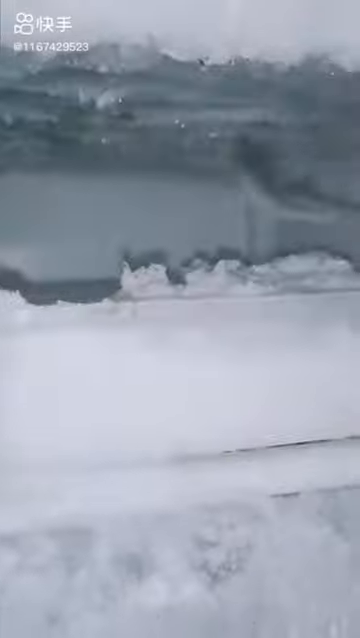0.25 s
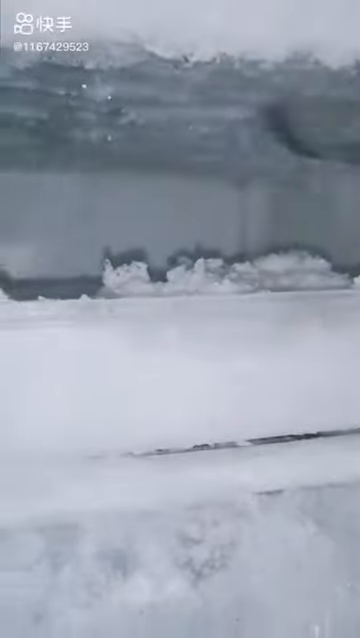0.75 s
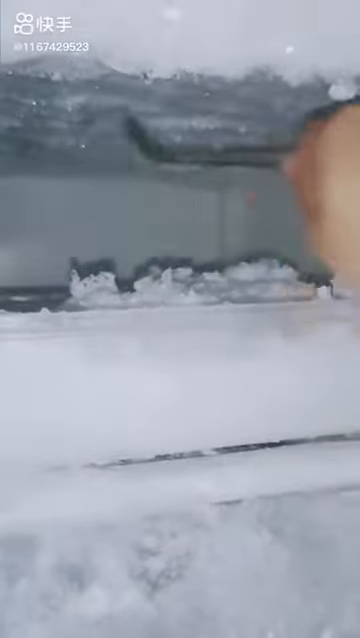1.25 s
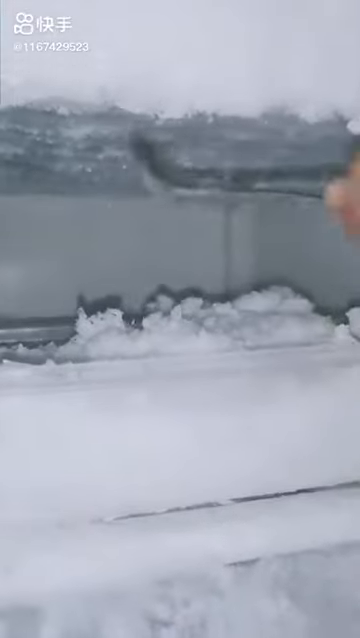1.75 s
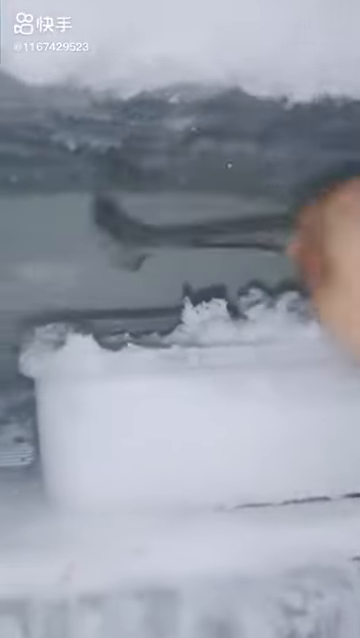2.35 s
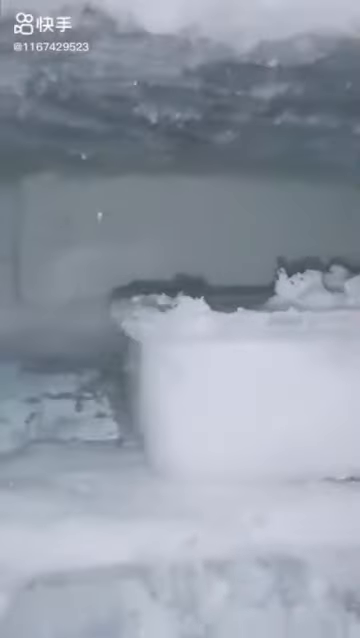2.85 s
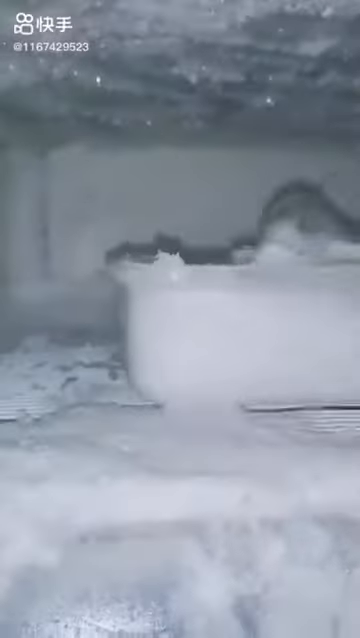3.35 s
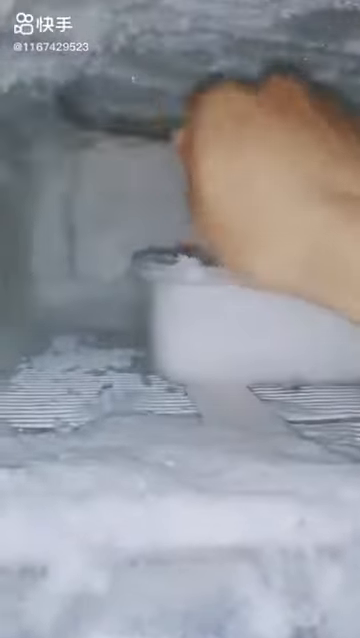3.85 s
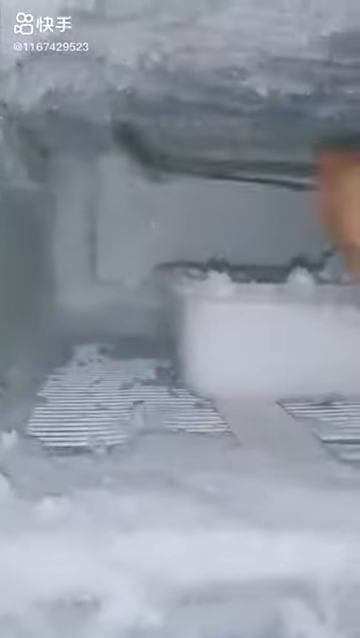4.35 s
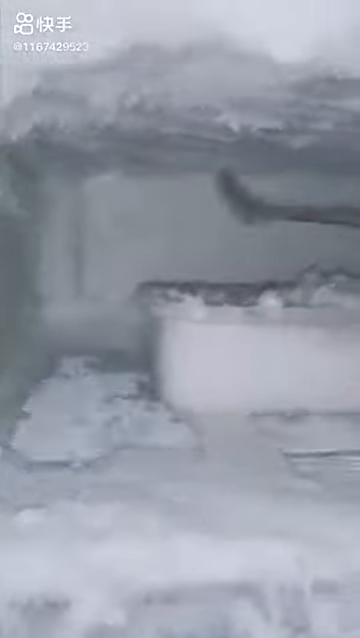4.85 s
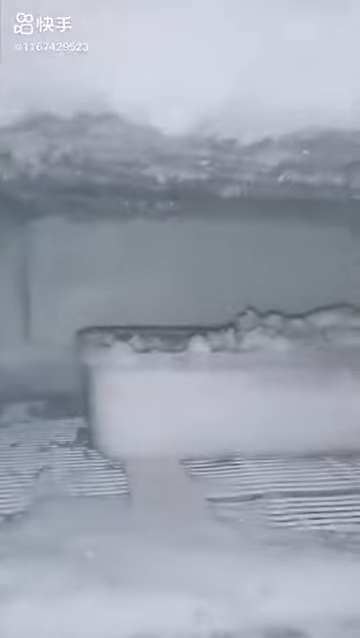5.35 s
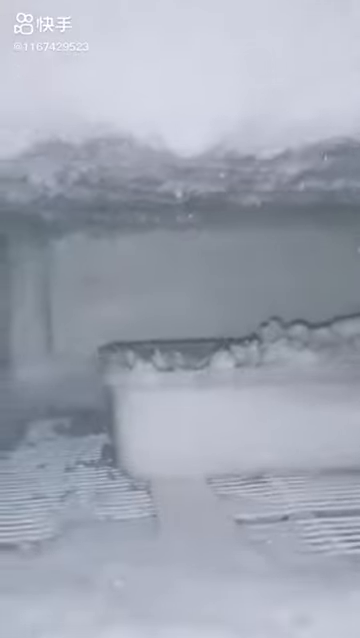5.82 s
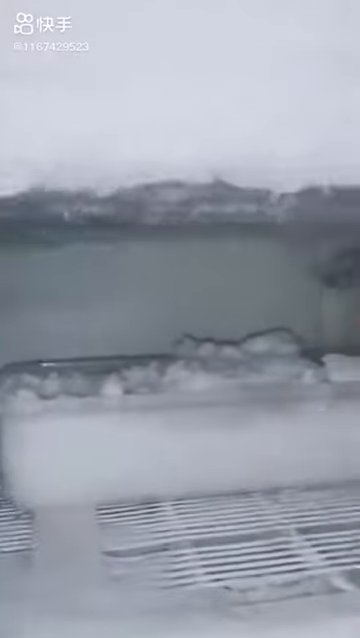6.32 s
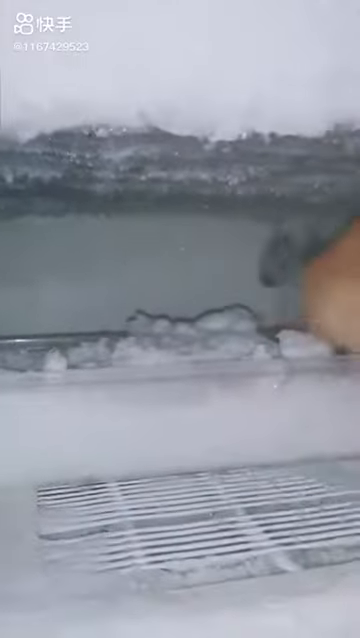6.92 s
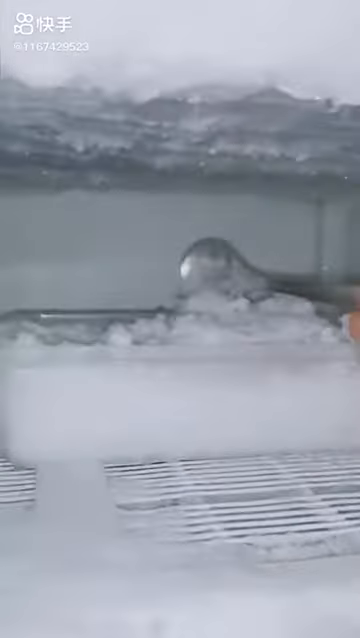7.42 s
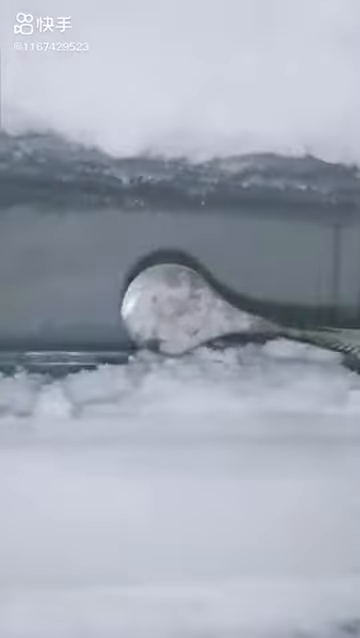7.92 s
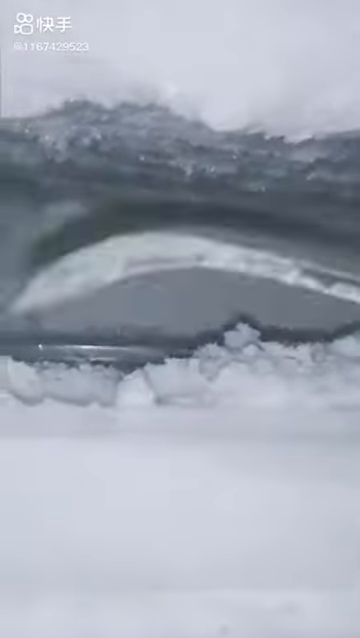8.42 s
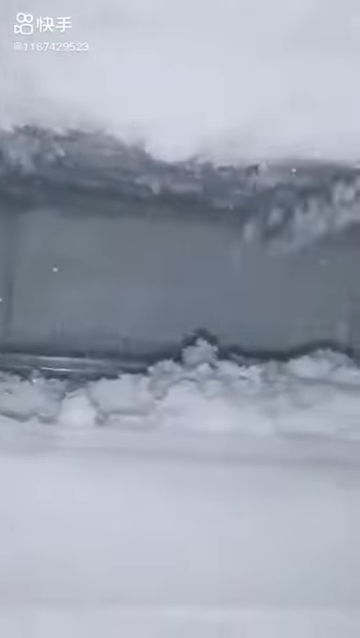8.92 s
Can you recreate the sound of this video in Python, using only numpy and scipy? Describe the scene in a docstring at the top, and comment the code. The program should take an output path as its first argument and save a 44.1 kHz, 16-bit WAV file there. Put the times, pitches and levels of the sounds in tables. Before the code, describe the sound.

Close, dry scraping of ice inside a small freezer compartment, uneven crunchy rasps, brittle ticks, dull bumps and soft sweeps of frost crystals.

```python
"""A metal scraper rasps frost off the roof of a freezer compartment, close to the microphone.
Strokes excite fizz, blade modes and the hollow liner with stick-slip bursts of tiny ice fractures.
Sweeps of loose frost hiss from trains of grains; knocks, snaps and clacks are brief impulsive breaks.
Bumps are damped hollow notes and squeaks are narrow noise bands, each flake colours the rasp, and dense
reflections answer from the small compartment. Shaped noise, a wavering hum and a rumble lie underneath."""
import sys
import numpy as np
from scipy import signal
from scipy.fft import rfft, irfft
from scipy.io import wavfile
from scipy.ndimage import uniform_filter1d

SR = 44100
rng = np.random.default_rng(int(sys.argv[2]) if len(sys.argv) > 2 else 0)


def store_wav(level_fs):
    """Save 16-bit WAV to argv[1]."""
    pcm = np.round(np.clip(np.atleast_2d(level_fs), -1, 1) * 32767)
    wavfile.write(sys.argv[1], SR, pcm.T.astype(np.int16))


N = 404816  # samples

# Background noise floor. Each row: frequency in Hz, relative level in dB.
FLOOR_COLOUR = [(15, -41.5), (25, -16), (59, -12.5), (120, -18), (156, -13), (187, -23.5), (237, -8.5),
                (593, -25), (4810, -42.5), (5780, -27.5), (13000, -60)]
FLOOR_DB = -43.5  # rms
# Steady hum. Each row: frequency in Hz, level in dB before it wavers.
HUM = [(57, -45.5), (101, -53.5), (165, -53.5)]
# The arm rubs and jostles the cabinet: one list per spell. Each row: time in seconds, level in dB.
JOSTLE = [
    [(2.4, -40.5), (3.016, -39.5), (3.06, -50), (3.36, -41), (3.396, -32.5), (3.708, -41), (3.82, -55)],
    [(7.1, -47), (7.58, -44), (7.678, -53), (7.866, -39), (8.1, -59)],
]
# Colour of that rumble. Each row: frequency in Hz, relative level in dB.
RUMBLE_COLOUR = [(15, -10), (45, -4), (110, 4.5), (220, -6.5), (400, -6.5), (1500, -62)]
# Likeness of left and right in the background. Each row: frequency in Hz, correlation (1 is mono).
LIKENESS = [(50, 0.39), (300, 0.82), (1000, 0.024), (5000, 0.014)]

# Pushes of the blade. Each row: start, leaning in, hold and lifting off in seconds, then drive in dB of
# the fizz of loose frost, the crunch of hard ice and the push on the liner, before trims.
STROKES = [ (0.065, 0.11, 0.082, 0.174, -22.5, -24.5, -27.5),
           (0.27, 0.051, 0.024, 0.097, -27.5, -23, -22.5), (0.48, 0.11, 0.012, 0.079, -34, -36.5, -37.5),
           (0.774, 0.031, 0.24, 0.017, -26, -22, -26.5), (1.062, 0.0039, 0.038, 0.039, -42.5, -43, -41),
           (1.399, 0.083, 0.078, 0.083, -23, -22.5, -25.5), (1.614, 0.0034, 0.082, 0.063, -37.5, -38, -43),
           (2.002, 0.12, 0.078, 0.065, -25, -23.5, -24), (2.701, 0.062, 0.055, 0.045, -30.5, -28.5, -26.5),
           (2.786, 0.021, 0.14, 0.12, -28, -25, -22.5), (2.98, 0.065, 0.014, 0.11, -30, -28, -30.5),
           (3.997, 0.0023, 0.042, 0.11, -28.5, -24.5, -35.5), (4.082, 0.006, 0.165, 0.18, -26, -27, -26),
           (4.308, 0.034, 0.019, 0.063, -32, -31, -26.5), (4.625, 0.084, .11, 0.11, -21, -24.5, -23.5),
           (4.883, 0.0038, 0.061, 0.031, -33.5, -38.5, -36.5), (5.219, 0.07, 0.076, 0.1334, -25, -23, -23),
           (6.142, 0.0058, 0.09, 0.029, -31, -33, -36), (6.381, 0.013, 0.033, 0.048, -27.5, -23.5, -24),
           (6.475, 0.0075, 0.022, 0.077, -28, -25.5, -30.5), (6.752, 0.03, 0.06, 0.059, -23, -22.5, -25),
           (6.872, 0.019, 0.041, 0.054, -25.5, -22.5, -24.5),
           (8.025, .001, 0.013, 0.025, -24.5, -29, -26.5), (8.053, 0.0049, 0.015, 0.036, -25.5, -29, -37),
           (8.416, 0.066, 0.021, 0.052, -39.5, -40.5, -45.5), (8.893, 0.049, 0.01, 0.023, -30.5, -32, -48),
           (9.05, 0.037, 0.016, 0.046, -28.5, -27, -45), ]
# The ice varies from place to place. Each row: time in seconds, then tilts in dB per octave of the fizz,
# the crunch and the liner.
ICE = [(0.3, 3, 2, 1.5), (1.5, -14.5, 10.5, 8), (2.15, -2, 3.5, 5), (2.9, 1.5, 3.5, 4.5), (3.6, -6, 1, 0),
       (4.2, -3, -1.5, 4.5), (5.0, 2, -2.5, -2), (6.001, -0.5, -5.5, 11), (6.45, -1, -14.5, 4.5),
       (6.9, -1.5, -9, 4.5), (7.8, -3, 0.5, 2.5), (9.0, 3, -2.5, 10.5)]
# Colours of one fracture. Each row: frequency in Hz, relative level in dB.
FIZZ = [(2500, -28), (4100, -21.5), (5200, 3), (6200, 0), (7100, 12), (7800, -1.5), (8600, -6.5),
        (9500, -14), (9950, -18), (11200, -9), (13000, -11)]
CRUNCH = [(100, -60), (400, -24.5), (850, -6.5), (1350, 3.5), (1950, 0.5), (2600, 3.5), (3300, 2.5),
          (3950, -2), (4600, 2.5), (5400, 0), (8000, -20.5)]
THUD = [(50, -41.5), (130, -2.5), (350, 4.5), (460, 4), (700, 10), (900, -3), (1500, -36), (4000, -69)]
# Modes of the liner and of the blade. Each row: frequency in Hz, relative level in dB, left over right in dB.
LINER_MODES = [(154.5, -5.5, 2.5), (236.8, -6.5, -3), (303.4, -4, -0.5), (450.4, 3.5, 2), (477, 0, 0.5),
               (563, -1, 11.5), (581.3, -6, 13), (664, -9.5, 12), (958, -13, -10), (1085, -15.5, 14)]
BLADE_MODES = [(5050, -14, 32), (5440, -4, -16), (7090, 3, -15)]
# How strongly the pressure's growth in dB acts, as factors for the fizz, the crunch and the liner.
FOLLOW = (0.63, 0.79, 0.68)
BITE_DB = 14  # how far below full pressure the edge first bites, before the FOLLOW factor
LIFT_DB = 35  # fall in pressure over one lift-off time
LINER_HANG_S = 0.0098  # the liner keeps shaking after the blade starts to lift
GRIP_S = 0.0017  # how fast the edge takes hold
# Lowest and highest note of the loose chips, in Hz.
CHIP_HZ = (1320, 5900)
CHIP_DB = -13.5  # against the crunch, before the trim of the stroke

# The blade lands or catches on a lump. Each row: time in seconds, fizz level in dB, crunch and liner in dB
# against the fizz, decay time of the break-up in seconds.
KNOCKS = [(0.067, -4.5, -16, -3, 0.00086), (0.396, -20.5, 4.5, 6, 0.003), (0.78, -21, 2.5, 3.5, 0.008),
          (0.875, -19.5, 15, -2, 0.0023), (1.04, -20, -15, 7.5, 0.0051), (1.398, -11, -9, -1.5, 0.0041),
          (1.914, -23.5, -8.5, -8, 0.0079), (2.004, -15, -14, -4, 0.0031), (2.584, -30, -11, -0.5, 0.018),
          (2.707, -21, 2.5, 14, 0.0071), (3.042, -18.5, 1, -6.5, 0.0099), (3.518, -16, -8, 2, 0.0088),
          (3.634, -24, -2, 12, 0.0045), (4.004, -11.5, 6, 12, 0.0017), (4.084, -25.5, 5.5, 16, 0.0093),
          (4.207, -17, -3.5, 4, 0.0078), (4.628, -24.5, 0, 9.5, 0.0091), (5.157, -40, 6.5, 16, 0.012),
          (5.396, -10.5, -19, 2.5, 0.0053), (5.961, -17.5, 6.5, 6, 0.002), (6.061, -31.5, -7.5, -10, 0.032),
          (6.163, -29, 13.5, 11, 0.0055), (6.27, -17, -7.5, -5.5, 0.0067), (6.388, -10, -15, -10, 0.0052),
          (6.9, -14, -1.5, 4, 0.0049), (7.495, -20, -20, -20, .006), (7.638, -18, -23, -25, 0.0053),
          (8.095, -22, -5, 11.5, 0.0019), (8.492, -27, -2, 8.5, 0.0039), (8.976, -19.5, -1.5, -6.5, 0.0043)]
# The blade squeaks on smooth ice. Each row: start and length in seconds, pitch in Hz, width in Hz,
# level in dB before the swell.
SQUEAKS = [(0.11, 0.093, 3360, 190, -28.5), (1.511, 0.095, 3880, 750, -24), (3.836, 0.17, 1430, 100, -47.5),
           (2.87, 0.055, 6900, 250, -24), (7.48, .1, 7000, 270, -26), (6.167, 0.024, 1100, 750, -20.5)]
# Single brittle snaps. Each row: time in seconds, strength in dB, crunch against fizz in dB.
SNAPS = [(0.173, 0, -20), (0.7802, 3.5, -25), (1.381, -12, -10), (1.635, -9, -4), (2.783, 2, -8),
         (3.755, 0.5, -16), (4.0041, 2, 1), (5.197, -13, 0), (5.961, -4, 11), (6.272, 0, -1.5),
         (6.786, -12, 0), (8.011, -4, 0), (8.0283, -0.5, 0), (8.038, -8, -7), (8.0962, 3, -9.5),
         (8.314, -15.5, -5), (8.87, -15.5, 2)]
SNAP_S = 0.00071  # decay time of a snap
# Sweeps of loose frost along the tray. Each row: start, leaning in, hold and lifting off in seconds,
# then levels in dB of the hiss, the crunch and the push on the tray at full pressure.
SWEEPS = [(3.394, 0.097, .27, 0.081, -24.5, -35.5, -32), (7.461, 0.07, 0.039, 0.13, -26.5, -38, -39.5),
          (7.601, 0.089, 0.094, 0.099, -22, -33.5, -34.5), (7.763, 0.038, 0.022, .05, -22.5, -36, -32),
          (7.825, 0.031, 0.078, 0.26, -29.5, -31.5, -32.5), (7.932, 0.053, 0.037, .03, -32.5, -35, -36.5),
          (8.09, .003, 0.017, 0.36, -35.5, -38.5, -41.5)]
# Colour of sliding frost. Each row: frequency in Hz, relative level in dB.
HISS = [(2500, -49), (4700, -19.5), (5100, -2), (6200, -3), (7100, 3.5), (8000, -5), (9000, -13),
        (9550, -10), (9950, -52), (10800, -16.5), (12200, -14.5), (13000, -27)]
# The hand or the blade bumps hollow plastic. Each row: time in seconds, frequency in Hz, level in dB
# before the soft onset, 60 dB decay time in seconds.
BUMPS = [(3.4, 100, -25, .2), (3.52, 640, -14, .045), (3.636, 850, -20, .035), (3.672, 400, -17, .05),
         (4.763, 290, -15, .08), (7.33, 55, -27, .35), (7.58, 58, -23, .2), (7.758, 205, -20, .12),
         (7.84, 100, -23, .28), (8.025, 100, -27, .12), (8.489, 678, -13, .05)]
# The blade strikes hard ice. Each row: time in seconds, level in dB.
CLACKS = [(4.004, -15.5), (5.96, -14.5), (6.166, -24), (6.272, -25), (6.485, -24), (6.706, -28),
          (6.787, -18.5)]
# Modes of the blade pressed against the wall. Each row: frequency in Hz before detuning, relative level
# in dB, 60 dB decay time in seconds.
CLACK_MODES = [(558, -4, 0.047), (1340, -6, 0.057), (1600, -2, 0.025), (1746, -15, 0.062),
               (2390, -6, 0.045), (2640, -10.5, 0.021), (3430, -11.5, 0.025), (6030, -11, .02)]
EDGE_HZ = 13250  # upper band limit


def amp(db):
    """A level in decibels is the logarithm of an amplitude ratio."""
    return 10 ** (np.asarray(db) / 20)


def evened(x):
    """Normalisation to unit rms."""
    return x / np.sqrt(np.mean(x ** 2) + 1e-20)


def unit(response):
    """Normalisation of a stereo response so that its mid has energy 1."""
    return response / np.linalg.norm(response.mean(0))


def read(points, hz):
    """Interpolation of a curve along a logarithmic frequency axis."""
    f, value = np.transpose(points)
    return np.interp(np.log(hz + 1), np.log(f + 1), value)


def add(mix, s, sound):
    """Superposition: a sound adds to the mix from time s."""
    part = mix[:, max(round(s * SR), 0):][:, :sound.shape[1]]
    part += sound[:, :part.shape[1]]


def wander(n, hz):
    """Slow random modulation of rms 1: straight lines between hz random values a second."""
    knots = np.arange(n) * hz / SR
    count = int(knots[-1]) + 2
    return evened(np.interp(knots, np.arange(count), rng.standard_normal(count)))


def noise(colour):
    """Partial coherence: shaped stereo noise whose channels share part of each frequency."""
    hz = np.fft.rfftfreq(N, 1 / SR)
    left, other = rfft(rng.standard_normal((2, N)))
    same = np.clip(read(LIKENESS, hz), -1, 1)
    right = same * left + np.sqrt(1 - same ** 2) * other
    return evened(irfft(np.array([left, right]) * amp(read(colour, hz)), N))


def background():
    """Superposed room noise, modulated hum tones and the rumble of the arm against the cabinet."""
    t = np.arange(N) / SR
    hum = 0
    for hz, db in HUM:
        tone = np.sin(2 * np.pi * hz * t + 1.03 * wander(N, 12))
        hum = hum + amp(db) * tone * amp(3.6 * wander(N, 9))
    jostle = 0
    for contour in JOSTLE:
        times, db = np.transpose(contour)
        jostle = jostle + np.interp(t, times, amp(db), 0, 0)
    return amp(FLOOR_DB) * noise(FLOOR_COLOUR) + hum * amp([[-1.2], [1.2]]) + jostle * noise(RUMBLE_COLOUR)


def tilted(table, db_per_octave, pivot_hz):
    """Spectral tilt: levels lean about a pivot frequency."""
    out = np.array(table, float)
    out[:, 1] += db_per_octave * np.log2(out[:, 0] / pivot_hz)
    return out


def click(colour, size=4096, uneven=1):
    """Minimum phase: the most compact causal click of this spectrum, divided by an uneven response."""
    log_gain = np.log(amp(read(colour, abs(np.fft.fftfreq(size, 1 / SR)))) / uneven)
    return np.fft.ifft(np.exp(np.conj(signal.hilbert(log_gain)))).real


def ring(modes, cycles, spread_db, skew, size=6000):
    """Modal ringing: each mode falls 60 dB in so many cycles; random weights and phases mark the place."""
    hz, db, pan_db = np.transpose(modes)[:, :, None]
    t, t60 = np.arange(size) / SR, cycles / hz
    weight, phase, lag = rng.standard_normal((len(modes), 3)).T[:, :, None]
    out = []
    for side in (1, -1):
        level = amp(db + spread_db * weight + side * pan_db / 2 - 60 * t / t60) / np.sqrt(t60)
        out.append((level * np.sin(2 * np.pi * (hz * t + phase) + side * skew * lag)).sum(0))
    return unit(np.array(out))


def compartment(colour, t60, wet_db, lag_s, size=6000):
    """Dense reflection between icy walls ripples a click's spectrum but keeps its broad colour."""
    t = np.arange(size) / SR
    sparse = rng.standard_normal((2, size)) * (rng.random((2, size)) < .15)
    taps = sparse * (t > .0008) * amp(-60 * t / t60)
    taps *= amp(wet_db) / np.linalg.norm(taps, axis=1, keepdims=True)
    for port in taps:
        port[int(rng.random() * lag_s * SR)] += 1  # direct sound
    z = np.fft.fft(taps)
    power = (abs(z) ** 2).mean(0) + abs(z.mean(0)) ** 2
    broad = uniform_filter1d(power, size=45, mode="wrap") ** .5
    return unit(signal.fftconvolve(taps, click(colour, size, broad)[None], axes=1)[:, :size])


def contact(s):
    """Impulse responses of a fracture at one place on the roof: as fizz, as crunch and through the liner."""
    times, *tilts = np.transpose(ICE)
    fizz_tilt, crunch_tilt, liner_tilt = (np.interp(s, times, tilt) for tilt in tilts)
    fizz = compartment(tilted(FIZZ, fizz_tilt, pivot_hz=7000), t60=0.036, wet_db=0.0, lag_s=.0003)
    blade = ring(tilted(BLADE_MODES, fizz_tilt, pivot_hz=7000), cycles=200, spread_db=2, skew=.8)
    crunch = compartment(tilted(CRUNCH, crunch_tilt, pivot_hz=2000), t60=0.096, wet_db=4.0, lag_s=0.00045)
    thud = compartment(tilted(THUD, liner_tilt, pivot_hz=500), t60=0.18, wet_db=3.0, lag_s=0.00019)
    thud = thud * amp([[2.5], [-2.5]])
    drum = ring(tilted(LINER_MODES, liner_tilt, pivot_hz=500), cycles=53, spread_db=2.5, skew=0.33)
    return unit(fizz + amp(-15.0) * blade), unit(crunch), unit(drum + amp(-6.5) * thud)


def fractures(n, per_s, spread_db):
    """Random impulse train: tiny breaks of either sign whose decibel sizes spread exponentially."""
    size = amp(spread_db * np.minimum(rng.exponential(1, n), 4))
    return evened(size * rng.choice([-1, 1], n) * (rng.random(n) < per_s / SR))


def stick_slip(n, per_s, jitter, release_s, depth):
    """Stick-slip friction: the edge lets go at uneven intervals, each slip a fading burst in the envelope."""
    turns = np.cumsum(per_s * np.exp(jitter * wander(n, per_s))) / SR
    slips = np.diff(np.floor(turns), prepend=0) * rng.uniform(.3, 1, n)
    bursts = signal.lfilter([1], [1, -np.exp(-1 / (release_s * SR))], slips)
    return evened(1 + depth * evened(bursts))


def pressure(t, rise_s, hold_s, lift_s, follow):
    """Contact load as a level in dB: the edge bites, the hand leans in, holds, and lifts off."""
    lean = np.clip(1 - t / max(rise_s, .001), 0, 1) ** 1.2
    lift = np.maximum(t - rise_s - hold_s, 0) / max(lift_s, .005)
    return -BITE_DB * follow * lean - LIFT_DB * lift


def chips(n, per_s, crumble_s, sharpness, size=1200):
    """Resonant filtering: chips tear off at random, each a decaying noise burst around its own note."""
    out, t = np.zeros((2, n)), np.arange(size) / SR
    for at, place, strength in rng.random((int(per_s * n / SR) + 1, 3)):
        hz = CHIP_HZ[0] * (CHIP_HZ[1] / CHIP_HZ[0]) ** place
        shared, *ports = rng.standard_normal((3, size)) * np.exp(-t / crumble_s)
        burst = signal.lfilter(*signal.iirpeak(hz, sharpness, SR), shared + np.array(ports))
        add(out, at * n / SR, (.5 + strength) * evened(burst))
    return evened(out)


def smoothed_power(z):
    """Local energy averaged over neighbouring pitches and times."""
    power = uniform_filter1d((abs(z) ** 2).mean(0), size=21, axis=0)
    return abs(uniform_filter1d(power, size=7, axis=1)) + 1e-18


def flakes(x, patchy_db, swing, width_hz, life_s, size=512):
    """Time-varying filtering: each flake favours its own pitches and directions until it breaks away."""
    hz, t, z = signal.stft(x, SR, nperseg=size, noverlap=size - size // 4)
    across = np.exp(-(np.subtract.outer(hz, hz) / width_hz) ** 2)
    along = np.exp(-(np.subtract.outer(t, t) / life_s) ** 2)
    colour, pan, phase = (evened(across @ rng.standard_normal(z.shape[1:]) @ along) for _ in range(3))
    small = np.clip(hz / 2000, 0, 1)[:, None]  # long waves do not feel the flakes
    side = np.array([1, -1])[:, None, None]
    gain = amp(small * patchy_db * (np.clip(colour, -2, 2) + side * pan / 2))
    gain = gain * np.exp(1j * side * small * swing * phase)
    # a flake only moves energy between neighbouring pitches: the hand sets the loudness
    gain *= np.sqrt(smoothed_power(z) / smoothed_power(z * gain)) ** small
    return signal.istft(z * gain, SR, nperseg=size, noverlap=size - size // 4)[1]


def stroke(start, rise_s, hold_s, lift_s, fizz_db, crunch_db, liner_db):
    """Ploughing friction: the same slips drive fizz, crunch and liner, whose ring shifts with travel."""
    t = np.arange(0, np.round(rise_s + hold_s + lift_s + .07, 1), 1 / SR)
    n, length_s = len(t), rise_s + hold_s
    bite = np.minimum(t / GRIP_S, 1)
    grip = bite * stick_slip(n, per_s=130, jitter=.55, release_s=.002, depth=.85)
    fine = fractures(n, per_s=8000, spread_db=-1.5)
    coarse = fractures(n, per_s=3200, spread_db=2.5)
    fizzing = amp(fizz_db + pressure(t, rise_s, hold_s, lift_s, FOLLOW[0]))
    crushing = amp(crunch_db + pressure(t, rise_s, hold_s, lift_s, FOLLOW[1]))
    shaking = amp(liner_db + pressure(t, rise_s, hold_s + LINER_HANG_S, lift_s, FOLLOW[2]))
    drives = fine * fizzing, coarse * crushing * amp(-2.0), coarse * shaking
    travel = 2 * np.minimum(t / (length_s + lift_s / 2), 1)  # past three places on the roof
    rasp = 0
    for place in range(3):
        nearness = np.cos(np.pi / 2 * np.minimum(abs(travel - place), 1))
        for drive, response in zip(drives, contact(start + length_s * place / 2)):
            rasp = rasp + signal.fftconvolve((nearness * grip * drive)[None], response, axes=1)
    rasp = amp(-1.0) * rasp
    loose = chips(n, per_s=90, crumble_s=.0018, sharpness=4)
    add(rasp, 0, amp(CHIP_DB) * bite * crushing * loose)
    return start, flakes(rasp, patchy_db=6, swing=.6, width_hz=110, life_s=.026)


def knock(s, db, crunch_db, liner_db, length_s, size=2600):
    """Impact excitation: a lump shatters under the blade in a short burst of fractures."""
    t = np.arange(size) / SR
    shape = (1 - np.exp(-t / 0.0016)) ** 2 * np.exp(-t / max(length_s, .001))
    burst = evened(fractures(size, per_s=8300, spread_db=-1.0) * shape) * np.sqrt(np.mean(shape ** 2))
    gains = amp(db + np.array([0, crunch_db, liner_db]))
    response = sum(gain * part for gain, part in zip(gains, contact(s)))
    return s, signal.fftconvolve(burst[None], response, axes=1)


def squeak(s, length_s, hz, width_hz, db):
    """Narrow-band friction: the rubbing narrows to one unsteady note that swells and fades."""
    f = np.fft.rfftfreq(SR, 1 / SR)
    band = np.exp(-2 * ((f - hz) / max(width_hz, 10)) ** 2)
    n = int(np.clip(length_s, .01, .5) * SR)
    note = irfft(rfft(rng.standard_normal((2, SR))) * band)[:, :n] * amp(2 * wander(n, 45))
    blended = evened(note + note[::-1] / 2)  # each side leaks into the other
    return s, amp(db) * np.hanning(n) ** .5 * blended


def snap(s, db, crunch_db, size=400):
    """Brittle fracture: one flake breaks off with a dry tick; a thick one cracks lower."""
    age = np.arange(size) / SR / SNAP_S
    crack = rng.standard_normal(size) * np.sqrt(age) * np.exp(-age)
    tick = compartment(FIZZ, t60=.012, wet_db=-5, lag_s=0)
    low_crack = compartment(CRUNCH, t60=.03, wet_db=-2, lag_s=0)
    colour = tick + amp(crunch_db) * low_crack
    return s, amp(db) * unit(signal.fftconvolve(crack[None], colour, axes=1))


def sweep(start, rise_s, hold_s, lift_s, hiss_db, crunch_db, tray_db):
    """Granular flow: sliding crystals hiss wide, clumps crush unevenly and the tray murmurs under them."""
    t = np.arange(0, np.round(rise_s + hold_s + lift_s + .07, 1), 1 / SR)
    n, out = len(t), 0
    lumps = wander(n, 55)
    colours = HISS, CRUNCH, tilted(THUD, -1.6, pivot_hz=500)
    levels_db = hiss_db, crunch_db, tray_db
    shares = .2, .3, 1.6  # the part common to both sides, against each side's own
    lumpiness_db = 1.1, 2.2, 3.2
    for colour, db, follow, shared, lumpy_db in zip(colours, levels_db, FOLLOW, shares, lumpiness_db):
        both, *ports = (fractures(n, per_s=7000, spread_db=2.0) for _ in range(3))
        grains = (shared * both + np.array(ports)) * amp(lumpy_db * lumps)
        grains = signal.fftconvolve(grains, click(colour)[None], axes=1)[:, :n]
        load = amp(db + pressure(t, rise_s, hold_s, lift_s, follow))
        out = out + grains / grains.mean(0).std() * load
    return start, flakes(out * np.minimum(t / .015, 1), patchy_db=5, swing=.6, width_hz=130, life_s=.028)


def bump(s, hz, db, t60, size=6000):
    """Damped oscillation: a soft bump rings one hollow note."""
    t = np.arange(size) / SR
    note = amp(db - 60 * t / t60) * np.sin(2 * np.pi * hz * t) * (1 - np.exp(-t / .003))
    return s, note * amp([[2], [-2]])


def clack(s, db, size=4000):
    """Modal excitation: a ragged crack of hard ice rings the pressed blade, detuned afresh each time."""
    t = np.arange(size) / SR
    hz, mode_db, t60 = np.transpose(CLACK_MODES)[:, :, None]
    detune, phase, skew = rng.standard_normal((len(CLACK_MODES), 3)).T[:, :, None]
    level = amp(db + mode_db - 60 * t / t60)
    angle = 2 * np.pi * (hz * (1 + .02 * detune) * t + phase)
    rings = np.array([(level * np.sin(angle + side * skew)).sum(0) for side in (1, -1)])
    crack = rng.standard_normal(size) * np.sqrt(t) * np.exp(-t / 0.0022)
    return s, signal.fftconvolve(rings, crack[None] / np.linalg.norm(crack), axes=1)


def scene():
    """Superposition of every source over the background."""
    mix = background()
    sources = ((stroke, STROKES), (knock, KNOCKS), (squeak, SQUEAKS), (snap, SNAPS),
               (sweep, SWEEPS), (bump, BUMPS), (clack, CLACKS))
    for source, table in sources:
        for row in table:
            add(mix, *source(*row))
    return mix


def record(dry):
    """Linear-phase low-pass filtering: the recorder's band limit."""
    lowpass = signal.firwin(511, EDGE_HZ, window=("kaiser", 9), fs=SR)
    return signal.oaconvolve(dry, lowpass[None], "same")


dry = scene()
out = record(dry)
store_wav(out)
```